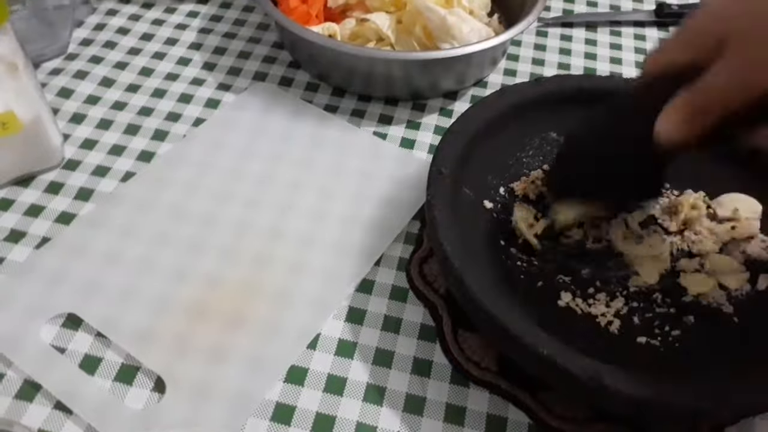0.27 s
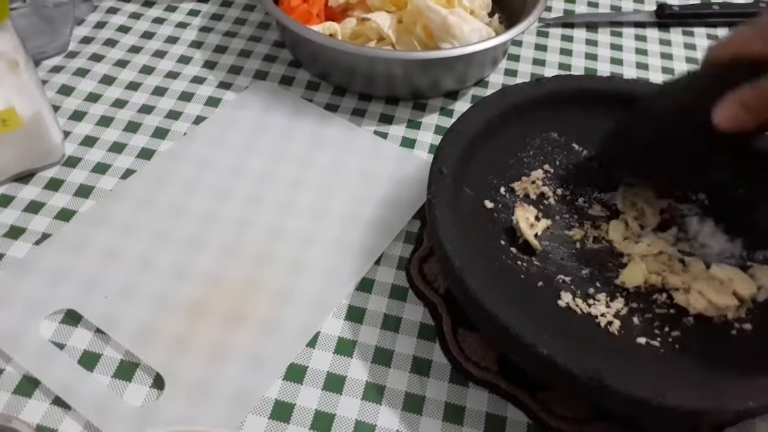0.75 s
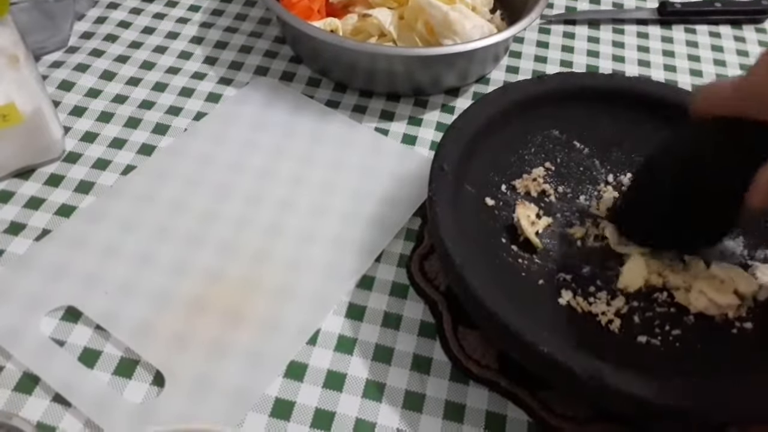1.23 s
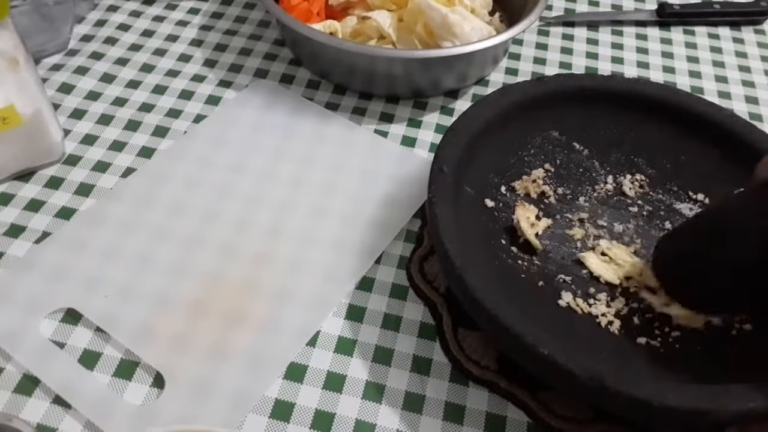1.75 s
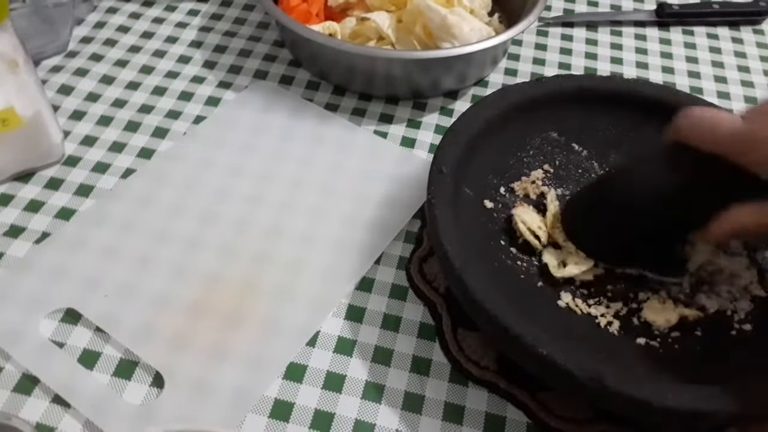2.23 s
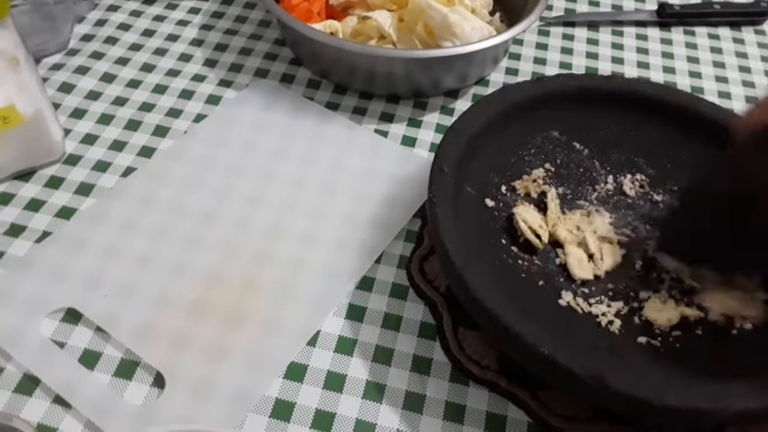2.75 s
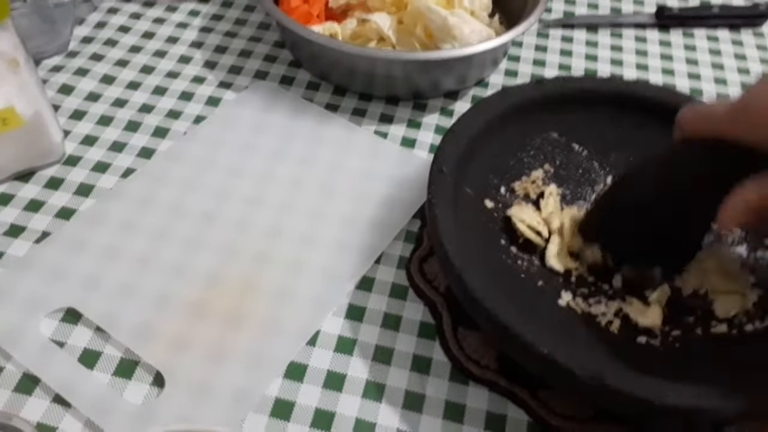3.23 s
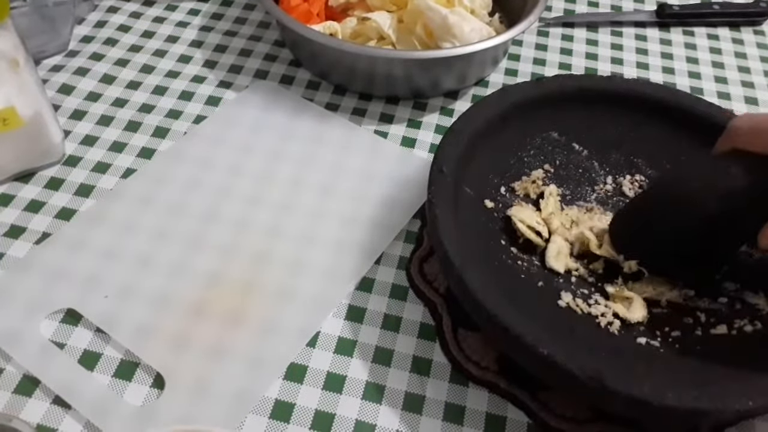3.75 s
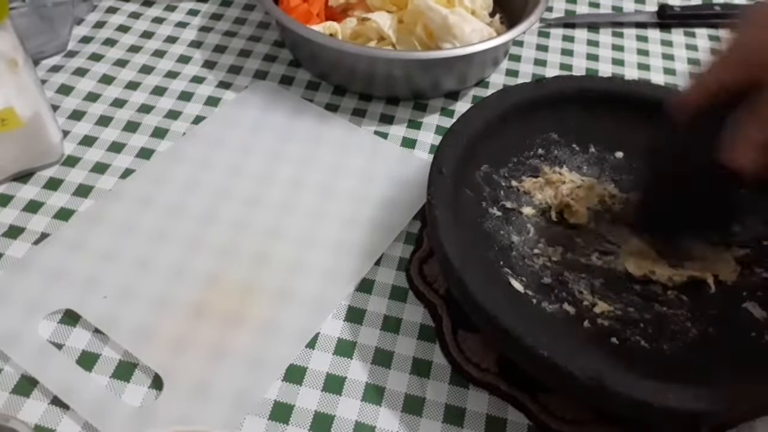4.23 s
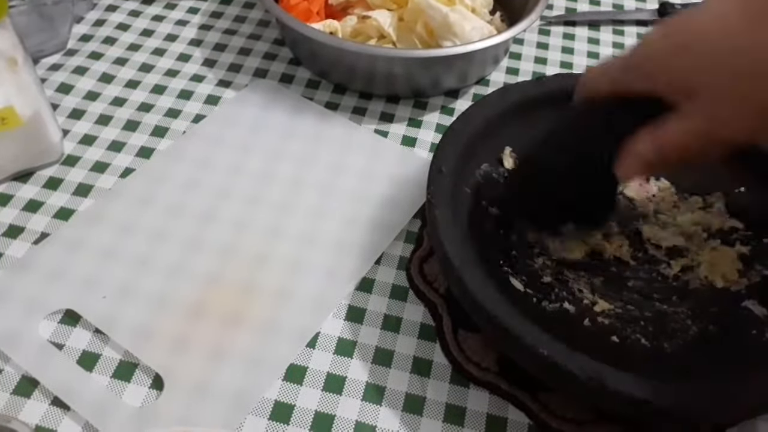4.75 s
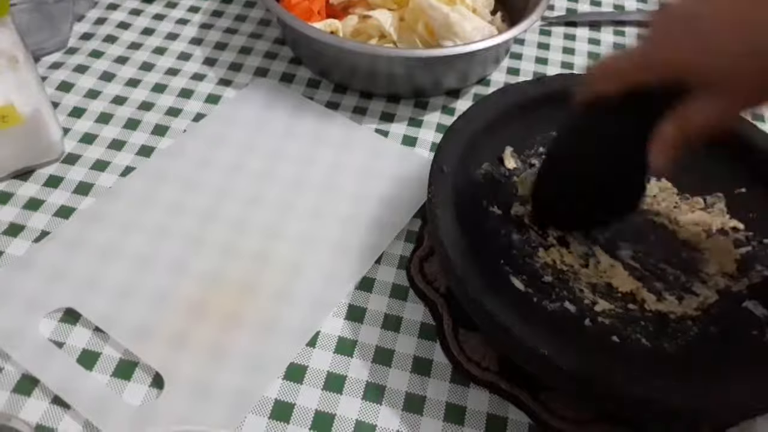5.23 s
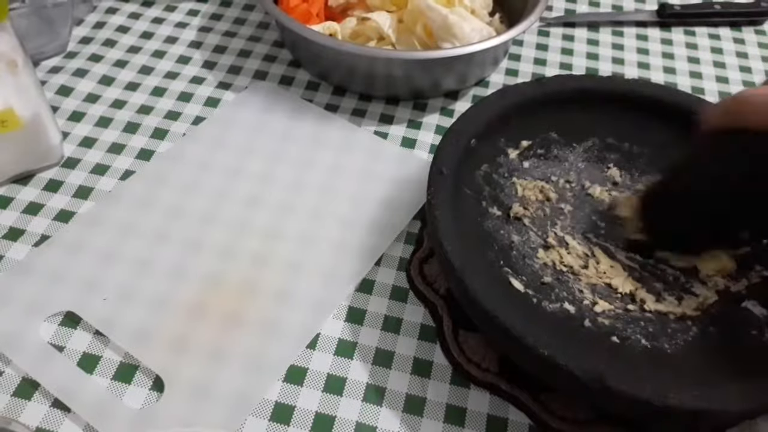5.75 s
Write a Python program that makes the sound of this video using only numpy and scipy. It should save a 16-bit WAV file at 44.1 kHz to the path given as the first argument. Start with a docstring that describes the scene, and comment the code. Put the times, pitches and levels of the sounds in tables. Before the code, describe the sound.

A stone pestle knocks, cracks peppercorns and grinds garlic in a stone mortar with short, gritty strokes.

```python
"""Small kitchen, one microphone close to a shallow stone mortar of garlic and peppercorns on the table.
In the first second the stone pestle knocks and chatters; in the next, corns crack under its tip.
It grinds on in short strokes: grit rings the pestle, wet garlic crackles, the mortar rumbles and rocks.
Near the end comes one more hard knock. A faint appliance hum lies under it all."""
import sys
import numpy as np
from scipy import signal
from scipy.fft import rfft, irfft
from scipy.io import wavfile
from scipy.ndimage import map_coordinates

SR = 44100
rng = np.random.default_rng(int(sys.argv[2]) if len(sys.argv) > 2 else 0)


def to_wav(sig):
    """Store sig (one row per channel, or 1-D mono) as 16-bit WAV at the path in sys.argv[1].

    Samples outside -1..1 are clipped; the rate is SR.
    """
    pcm = np.clip(np.atleast_2d(sig), -1, 1) * 32767
    pcm = np.round(pcm).astype(np.int16)
    wavfile.write(sys.argv[1], SR, pcm.T)  # frames by channels


N = 264159
TIME = np.arange(N) / SR

# modes of the mortar on its stand and table: f/Hz, width/Hz, level/dB
MORTAR_MODES = [(159.5, 19, -6.5), (196.2, 22.2, 1), (256.8, 29.2, 2.5), (323.6, 30, -1.5), (370.4, 38, 0),
                (461, 16, -4), (512.7, 30, -5.5), (604, 25, -3), (713.6, 28.6, -10), (832, 50, -9),
                (1014, 90, -18.5), (1298, 110, -20)]
# bending modes of the pestle, met on its flank: f/Hz, width/Hz, level/dB
FLANK_MODES = [(1558, 110, -5), (2086, 200, -5), (2651, 192, 9.5), (2784, 172, 9.5), (3420, 450, -7.5),
               (6090, 316, -5.5), (6040, 750, -21), (9960, 660, -44), (13600, 300, -33)]
# modes of the pestle, pressed on its tip: f/Hz, width/Hz, level/dB
TIP_MODES = [(1360, 1740, -11.5), (2790, 970, -9.5), (5144, 283, -4.5), (5515, 92, 4.5), (6080, 206, -6),
             (8690, 195, -9), (13570, 750, -26)]
# spectrum of crushed garlic: f/Hz, level/dB
GARLIC_SPECTRUM = [(300, -13.5), (1800, -8.5), (4000, -4.5), (6500, -0.5), (9000, 2), (12000, 2.5),
                   (14500, 4.5), (16000, -7)]
def grinding():
    """Slips make the mortar judder, hard grains ring its upper modes and the pestle, garlic cells burst."""
    stroke_gains = np.sqrt(creep() + pushes() + drags() + squashes())  # zero with the pestle lifted
    catch_and_slip = flutter(rate_hz=150, depth_db=3)
    judder, scrape, rub, grit, crackle = stroke_gains * catch_and_slip
    mortar_low = cut(ring(MORTAR_MODES), "low", 450, order=4)
    mortar_high = cut(ring(MORTAR_MODES), "high", 480, order=4)
    pressed_flank = ring(FLANK_MODES, damping=2.2)  # pressure damps the pestle
    mortar = rubbed(judder * from_db(-1.5) * grains(per_s=1500, spread_db=0.5), mortar_low)
    mortar += rubbed(scrape * from_db(-2.5) * grains(per_s=3000, spread_db=-1), mortar_high)
    flank = rubbed(rub * from_db(-1) * grains(per_s=3000, spread_db=2), pressed_flank)
    tip = grit * from_db(0.5) * wander(rubbed(grains(per_s=2800, spread_db=3), ring(TIP_MODES)))
    garlic = rubbed(crackle * from_db(1) * grains(per_s=4500, spread_db=3.5), colour(GARLIC_SPECTRUM))
    return mortar + flank + tip + garlic


# strokes of the tip: t/s, length/s, scrape level/dB, grit/dB re scrape, judder/dB re scrape
TIP_PUSHES = [(0.121, 0.034, -58.5, 11, -3), (0.461, 0.031, -56, 9, 9), (1.045, .03, -37, -8, -6),
              (1.126, 0.026, -48, -2, -11), (1.222, 0.034, -49, -12, -2), (1.287, 0.043, -52.5, -6, 1),
              (1.506, 0.048, -51.5, -12, -4), (1.943, 0.054, -48.5, -14, -24),
              (2.075, 0.078, -48.5, -6, -1.5), (2.265, 0.04, -49, -17, -6), (2.404, 0.061, -49.5, 3.5, -9),
              (2.672, 0.022, -45, -5, 2), (2.76, 0.081, -55.5, -5.5, 2), (2.913, .03, -42.5, -13, 8),
              (3.042, 0.051, -47, -3.5, 4), (3.189, 0.032, -41.5, -4.5, 2.5), (3.344, 0.077, -60, 1.5, 8),
              (4.208, 0.028, -50.5, -3, 3), (4.303, 0.057, -52.5, -1.5, 10.5),
              (4.416, 0.046, -50.5, -6.5, -14), (4.897, 0.029, -47.5, -1.5, 4), (4.987, 0.053, -55, -3, -6),
              (5.098, 0.073, -51.5, -5, 4.5), (5.227, 0.037, -49.5, -12, 7), (5.591, 0.063, -52, -5.5, 2),
              (5.786, 0.026, -42.5, -8.5, -0.5)]
def pushes():
    """The tip scrapes the mortar and rolls over grit."""
    start, length, db, grit_db, judder_db = np.transpose(TIP_PUSHES)
    return swells(start, length, attack_s=0.036, release_s=0.01,
                  judder=db + judder_db, scrape=db, rub=db - 32, grit=db + grit_db, crackle=db - 15.5)


# strokes of the flank: t/s, length/s, rub level/dB, scrape/dB re rub, judder/dB re rub
FLANK_DRAGS = [(0.137, 0.034, -60, 4.5, 0), (.49, 0.054, -68, 0, 19.5), (0.713, 0.046, -49, 1.5, 4),
               (0.866, 0.037, -58.5, -8, 11), (0.916, 0.058, -64.5, 6.5, 18), (1.621, 0.12, -59, 2, 12.5),
               (2.4, 0.077, -50.5, -1.5, -14), (2.48, 0.059, -60.5, 4.5, 19), (2.808, 0.033, -58, 11, 14.5),
               (3.088, 0.02, -57.5, 11, 2), (3.386, 0.087, -64.5, 0.5, 14), (4.418, 0.026, -57.5, 5, 2),
               (4.597, 0.037, -59.5, 6, 5.5), (4.778, 0.127, -56, 10, 8.5), (5.409, 0.015, -34.5, 1, -18),
               (5.43, 0.078, -57.5, 0.5, 7), (5.749, 0.068, -54.5, 4, 11)]
def drags():
    """The flank rubs over bare stone and sets the pestle ringing."""
    start, length, db, scrape_db, judder_db = np.transpose(FLANK_DRAGS)
    return swells(start, length, attack_s=0.021, release_s=0.012,
                  judder=db + judder_db, scrape=db + scrape_db, rub=db, grit=db - 12, crackle=db - 15)


# strokes into garlic: t/s, length/s, crackle level/dB
GARLIC_SQUASHES = [(0.034, 0.021, -53), (.145, 0.031, -62.5), (0.213, 0.076, -61), (0.48, .018, -46.5),
                   (1.306, .025, -58), (1.371, 0.042, -64.5), (1.733, 0.18, -56.5), (1.928, 0.039, -44.5),
                   (2.086, 0.15, -65.5), (2.216, 0.082, -56.5), (2.528, 0.085, -46.5), (2.647, 0.048, -55),
                   (2.893, 0.074, -52), (2.963, 0.028, -62), (3.019, 0.1, -64), (3.168, 0.037, -47.5),
                   (3.519, .11, -54), (4.157, 0.078, -55.5), (4.328, 0.047, -57), (4.426, 0.047, -48.5),
                   (4.603, 0.24, -58), (4.86, 0.29, -58.5), (5.097, 0.081, -55), (5.202, 0.11, -56),
                   (5.449, 0.07, -56), (5.57, 0.087, -56.5), (5.832, .095, -57)]
def squashes():
    """Garlic crackles and cushions the stone."""
    start, length, db = np.transpose(GARLIC_SQUASHES)
    return swells(start, length, attack_s=0.045, release_s=0.019,
                  judder=db - 2, scrape=db - 12, rub=db - 40, grit=db - 30, crackle=db)


# the pestle rests on the spices: t/s, length/s, level/dB
RESTING_CONTACTS = [(0, .3, -77), (.85, .19, -80), (1.08, .27, -70), (1.46, .12, -71), (1.635, .4, -67),
                    (2.09, .64, -69), (2.8, .38, -70), (3.27, .56, -83), (4.165, .34, -76), (4.62, .7, -70),
                    (5.44, .54, -72)]
def creep():
    """Light, creeping contact stirs every grinding layer faintly."""
    start, length, db = np.transpose(RESTING_CONTACTS)
    return swells(start, length, attack_s=0.004, release_s=0.016,
                  judder=db + 3.5, scrape=db, rub=db - 9, grit=db - 4, crackle=db - 0.5)


# peppercorns burst under the tip: t/s, level/dB, mortar jolt/dB
CORN_CRACKS = [(0.132, -51, -62), (0.9358, -41.5, -54), (1.0592, -18, -27), (1.1234, -23, -35),
               (1.217, -20, -29), (1.436, -21, -29), (1.5215, -42.5, -41.5), (1.9869, -21.5, -28.5),
               (2.428, -28, -47), (2.79, -39, -66), (3.072, -53, -50), (3.2021, -26, -40),
               (4.3275, -41, -50), (4.3442, -34.5, -52), (4.441, -38, -55), (5.245, -43, -39)]
# spectrum of a brittle burst: f/Hz, level/dB
BURST_SPECTRUM = [(70, -41), (250, -70), (700, -0.5), (1800, -22), (4000, 7), (6500, 11.5), (11000, 4),
                  (16000, 10)]
def cracks(split_s=0.005, split_loss_db=7):
    """A corn gives way, its halves break just after, and the tip rings as it drops onto the stone."""
    times, db, _ = np.transpose(CORN_CRACKS)
    force = blows(np.r_[times, times + split_s], np.r_[db, db - split_loss_db],
                  crumble_db=-8.5, crumble_s=0.0021)
    burst = from_db(-11.5) * through(force, colour(BURST_SPECTRUM))
    tip = from_db(-14.5) * through(force, ring(TIP_MODES))
    return burst + tip


# stone meets stone: t/s, level/dB, upper modes/dB re level, mortar jolt/dB
STONE_KNOCKS = [(0.4648, -26.5, -9.5, -29.5), (0.4873, -29, -13, -35), (0.6988, -18.5, -21.5, -22.5),
                (0.7419, -33.5, -17, -35), (0.8478, -43.5, -15, -31.5), (4.6042, -52, -10.5, -32.5),
                (5.404, -19.5, -18, -28), (5.4232, -26.5, -18, -43), (5.77, -43, -26, -52)]
def knocks(bounces=4, gap_s=0.0058, loss_db=8, brighter_db=5):
    """The pestle clinks, bounces unevenly, each time weaker and brighter, and crushes a little dust."""
    gaps = gap_s * np.exp(0.22 * rng.standard_normal((len(STONE_KNOCKS), bounces)))
    touches = [(start + gap[:k].sum(), db - k * loss_db, upper_db + k * brighter_db)
               for (start, db, upper_db, _), gap in zip(STONE_KNOCKS, gaps) for k in range(bounces)]
    times, db, _ = np.transpose(touches)
    dust = through(blows(times, db, crumble_db=-0.5, crumble_s=0.006), colour(BURST_SPECTRUM))
    clinks = strike(touches, FLANK_MODES, split_hz=4600, low_db=2, high_db=20)
    return clinks + from_db(-26.5) * cut(dust, "low", 4400, order=1)


# the toughest garlic fibres break: t/s, level/dB
FIBRE_SNAPS = [(.2393, -37), (1.8202, -23), (1.8755, -24), (1.913, -28), (1.937, -25), (2.569, -21.5),
               (3.159, -40), (4.7805, -28), (5.6723, -23)]
def snaps():
    """Single dry ticks from the garlic, too light to ring the stone."""
    times, db = np.transpose(FIBRE_SNAPS)
    return through(blows(times, db, crumble_db=-19, crumble_s=0.0007), colour(GARLIC_SPECTRUM))


# the mortar tips under pressure and drops back on the table: t/s, level/dB
MORTAR_DROPS = [(0.505, -32), (0.768, -45), (0.908, -33.5), (0.949, -36), (1.068, -27), (1.64, -35),
                (2.503, -64), (2.937, -25), (3.183, -28), (3.197, -22), (3.459, -34.5), (3.62, -40.5),
                (3.832, -53), (4.165, -48), (4.929, -33.5), (5.811, -28)]
def thumps(lag_s=0.001894):
    """The mortar rings low as it rocks, and just after every knock and crack."""
    jolts = [(start, db, -29) for start, db in MORTAR_DROPS]  # t/s, level/dB, upper modes/dB re level
    jolts += [(start + lag_s, db, -14) for start, _, _, db in STONE_KNOCKS]
    jolts += [(start + lag_s, db, -7) for start, _, db in CORN_CRACKS]
    return strike(jolts, MORTAR_MODES, split_hz=383, low_db=1.5, high_db=10)


# decay of the kitchen: f/Hz, T60/s
KITCHEN_DECAY = [(150, 0.053), (600, 0.17), (2500, 0.14), (6000, 0.093), (15000, 0.091)]
# reflections off nearby surfaces: delay/s, level/dB
NEAR_ECHOES = [(.0021, -27.5), (.0056, -17.5), (.0098, -22)]
def kitchen(direct, tail_db, size=22050):
    """The microphone hears the direct sound, close echoes and a diffuse tail that dies band by band."""
    t, tail = TIME[:size], np.zeros(size)
    edges_hz = np.geomspace(100, 17000, 9)
    for low, high in zip(edges_hz, edges_hz[1:]):
        band = cut(rng.standard_normal(size), "band", [low, high])
        t60 = at_hz(KITCHEN_DECAY, np.sqrt(low * high))
        tail += band * np.exp(-np.log(1000) * t / t60)
    tail *= 1 - np.exp(-t / 0.0048)  # the tail builds up
    response = from_db(tail_db) * tail / np.linalg.norm(tail)
    for delay, db in NEAR_ECHOES:
        response[int(delay * SR)] += from_db(db)
    return direct + through(direct, response)


# spectrum of the kitchen's still air: f/Hz, level/dB
AIR_SPECTRUM = [(15, -60.5), (25, -17), (53, -24), (161, -8.5), (200, -11), (363, -18), (659, -17),
                (1190, -23.5), (1370, -18.5), (1740, -25), (2050, -24), (2220, -26), (16000, -43)]
def room_tone(hum_hz=195):
    """Still air and a wavering appliance hum, far below the pestle in level."""
    air = from_db(-72) * rms_one(through(rng.standard_normal(N), colour(AIR_SPECTRUM)))
    hum = from_db(-72.5) * np.sqrt(2) * np.sin(2 * np.pi * hum_hz * TIME)
    return air + hum * flutter(rate_hz=14, depth_db=2.5)


def swells(starts, lengths, attack_s, release_s, judder, scrape, rub, grit, crackle):
    """Power of the five grinding layers, given in dB per stroke: pressure builds, then dies away."""
    stroke_gains = from_db([judder, scrape, rub, grit, crackle]).T
    power = np.zeros((5, N))
    for start, length, gains in zip(starts, lengths, stroke_gains):
        span = slice(max(int(start * SR), 0), int((start + length + 8 * release_s) * SR))
        t = TIME[span] - start
        pressure = np.clip(t / attack_s, 0, 1) * np.exp(-np.maximum(t - length, 0) / release_s)
        power[:, span] += np.outer(gains, pressure) ** 2
    return power


def grains(per_s, spread_db):
    """Tiny contacts of random time and size; rms 1."""
    sizes = from_db(spread_db * np.minimum(rng.exponential(1, N), 4)) * rng.choice([-1, 1], N)
    return rms_one(sizes * (rng.random(N) < per_s / SR))


def rubbed(force, body):
    """A body driven by dense contacts, at the level of the force."""
    return through(force, body / np.linalg.norm(body))


def wander(x):
    """The resonances shift a little as the contact stiffens and eases."""
    speed = flutter(rate_hz=8, depth_db=0.13)
    return map_coordinates(x, [np.cumsum(speed) % N])


def flutter(rate_hz, depth_db):
    """A factor that wavers randomly around 1."""
    steps = rng.standard_normal(N // 20)
    return from_db(depth_db * np.interp(TIME * rate_hz, np.arange(len(steps)), steps))


def blows(times, levels_db, crumble_db, crumble_s, size=2048):
    """Force of each blow: one sharp pulse, then a dying spray of smaller contacts."""
    force = np.zeros(N + size)
    sprays = rng.standard_normal((len(times), size)) * np.exp(-TIME[:size] / crumble_s)
    sprays *= from_db(crumble_db)
    sprays[:, 0] = 1
    for time, gain, spray in zip(times, from_db(levels_db), sprays):
        start = int(time * SR)
        force[start:start + size] += gain * spray
    return force[:N]


def strike(hits, modes, split_hz, low_db, high_db):
    """Blows on a body; the harder the contact, the more the modes above the split ring."""
    times, db, upper_db = np.transpose(hits)
    soft = blows(times, db + low_db, crumble_db=-35, crumble_s=0.004)
    hard = blows(times, db + upper_db + high_db, crumble_db=-32, crumble_s=0.004)
    body = ring(modes)
    return through(soft, cut(body, "low", split_hz)) + through(hard, cut(body, "high", split_hz))


def ring(modes, damping=1, size=8192):
    """Impulse response of a body: damped sines of alternating sign, peak 1."""
    t, body = TIME[:size], np.zeros(size)
    for k, (hz, width, db) in enumerate(modes):
        envelope = from_db(db) * width * np.exp(-np.pi * damping * width * t)
        body += (-1) ** k * envelope * np.sin(2 * np.pi * hz * t)
    body = cut(body, "high", 135, order=3)  # small bodies radiate no deep bass
    return body / np.abs(body).max()


def colour(spectrum, size=4096):
    """Causal (minimum-phase) impulse response with the given spectrum."""
    gains = from_db(at_hz(spectrum, np.fft.rfftfreq(size, 1 / SR)))
    cepstrum = irfft(np.log(gains))
    cepstrum[1:size // 2] *= 2
    cepstrum[size // 2 + 1:] = 0
    return irfft(np.exp(rfft(cepstrum)))


def through(x, response):
    """Pass a sound through an impulse response."""
    return signal.fftconvolve(x, response)[:N]


def cut(x, kind, hz, order=2):
    """Low-pass, high-pass or band-pass."""
    return signal.sosfilt(signal.butter(order, hz, kind, fs=SR, output="sos"), x)


def at_hz(points, hz):
    """Read a table on a log-frequency axis."""
    f, value = np.transpose(points)
    return np.interp(np.log(np.maximum(hz, 1)), np.log(f), value)


def from_db(db):
    """Decibels to gain."""
    return 10 ** (np.asarray(db) / 20)


def rms_one(x):
    """Scale to unit rms."""
    return x / np.sqrt(np.mean(x ** 2) + 1e-20)


def scene():
    """Pestle and mortar close to one microphone, the kitchen behind them."""
    work = grinding() + knocks() + cracks() + snaps() + thumps()
    return (kitchen(work, tail_db=-11) + room_tone())[None]


def record(dry):
    """The microphone signal is cut steeply above 16 kHz."""
    return signal.sosfilt(signal.ellip(10, 0.2, 70, 16000, fs=SR, output="sos"), dry)


dry = scene()
out = record(dry)
to_wav(out)
```